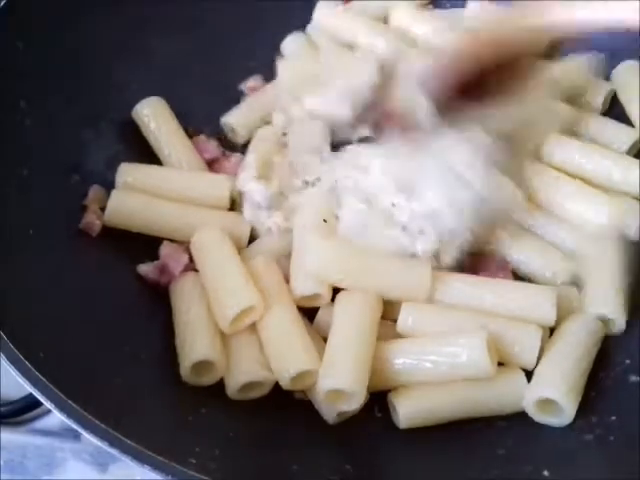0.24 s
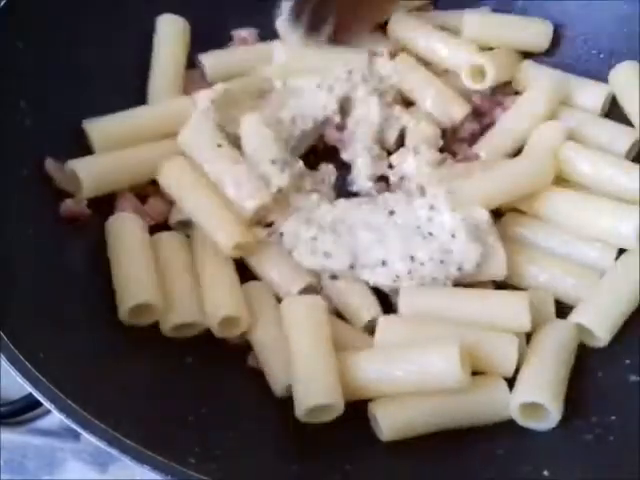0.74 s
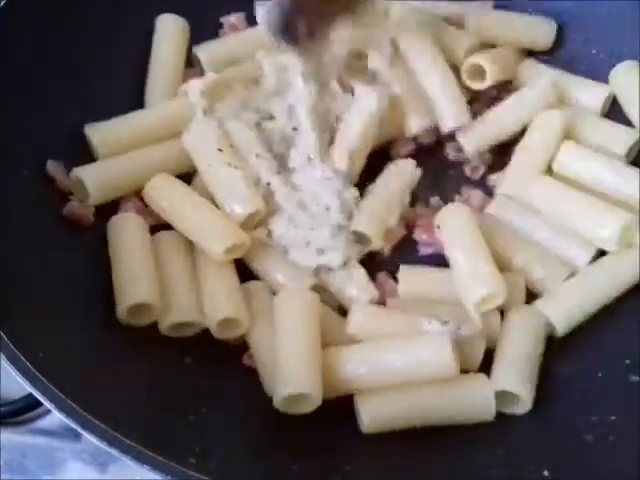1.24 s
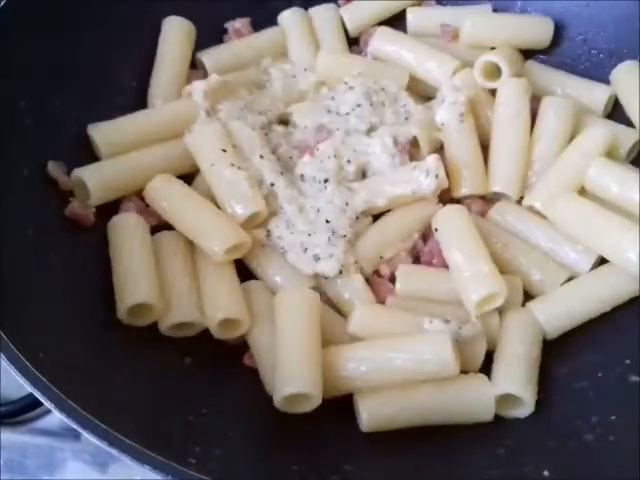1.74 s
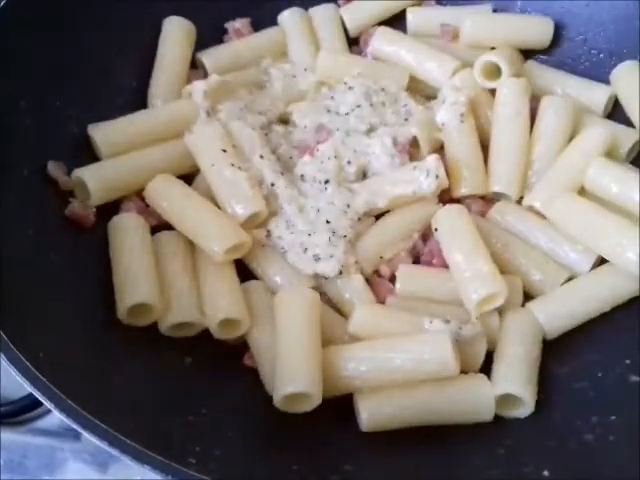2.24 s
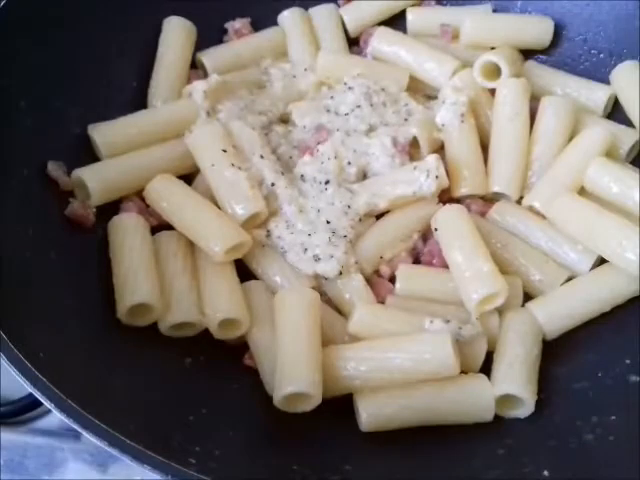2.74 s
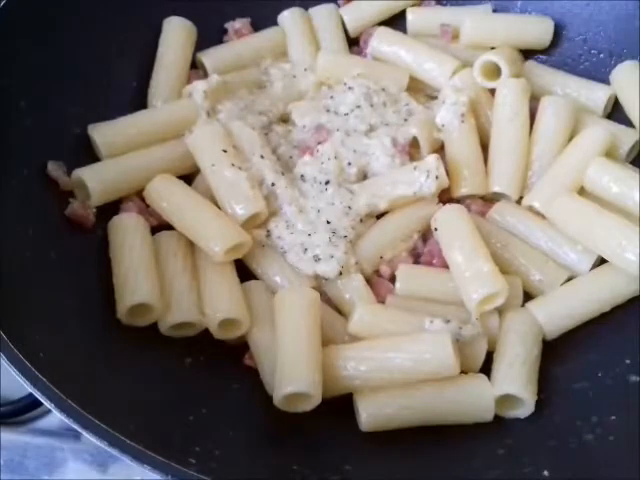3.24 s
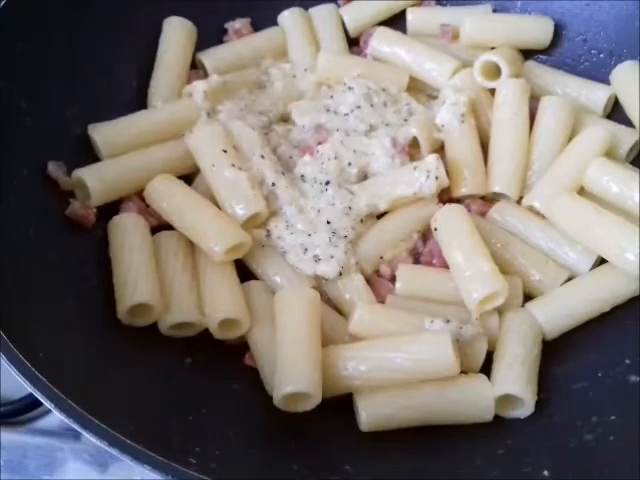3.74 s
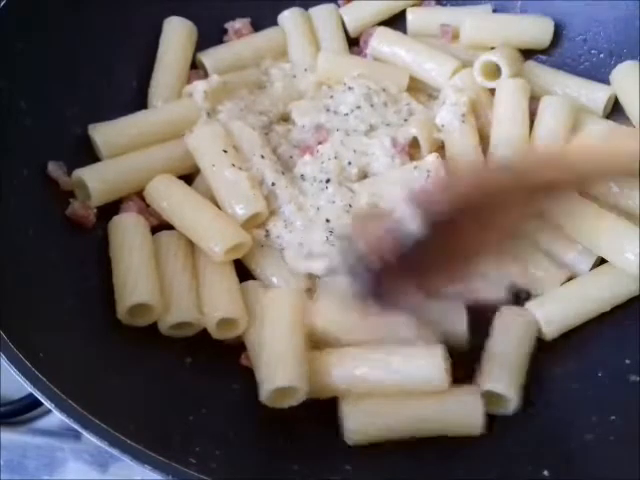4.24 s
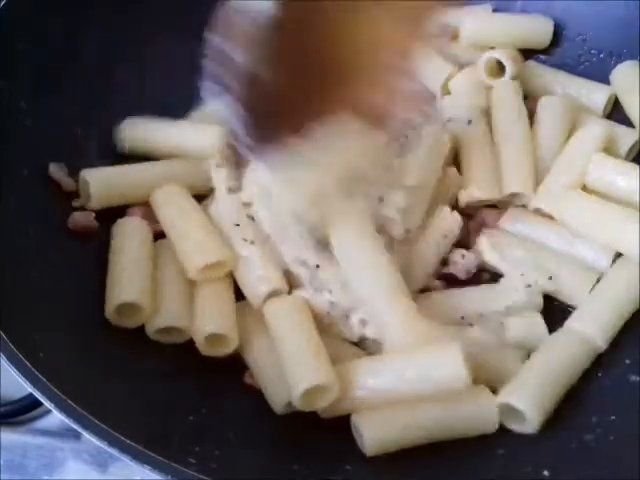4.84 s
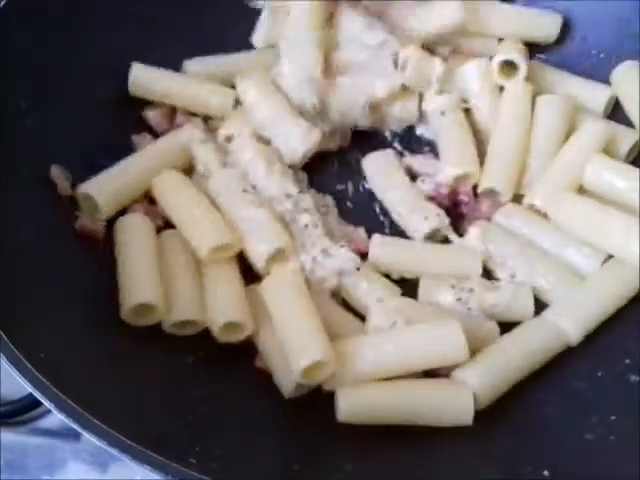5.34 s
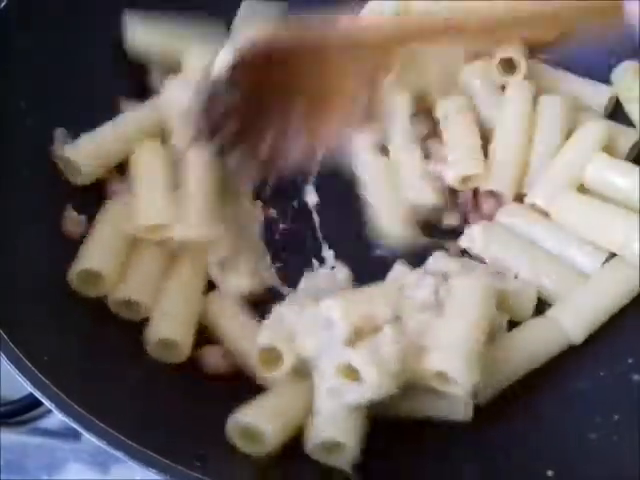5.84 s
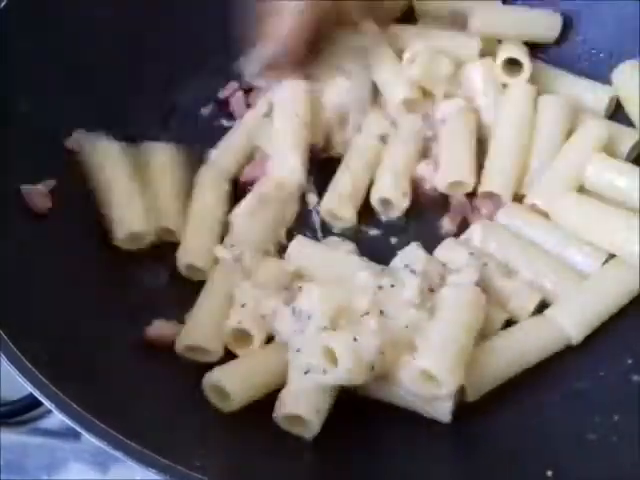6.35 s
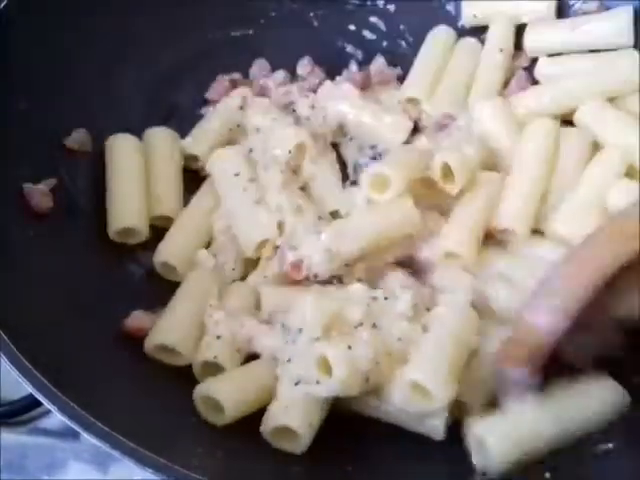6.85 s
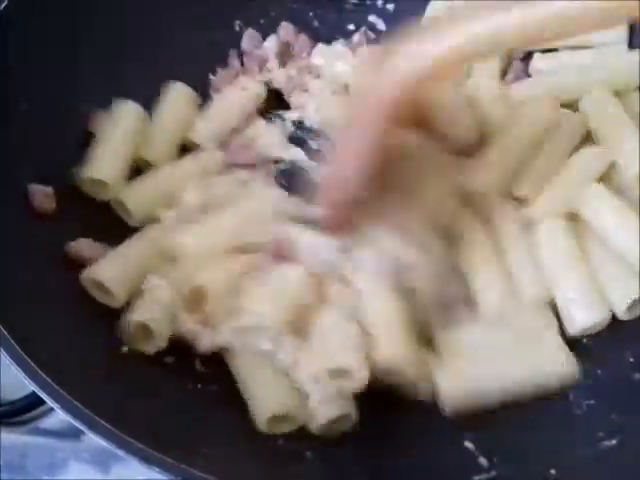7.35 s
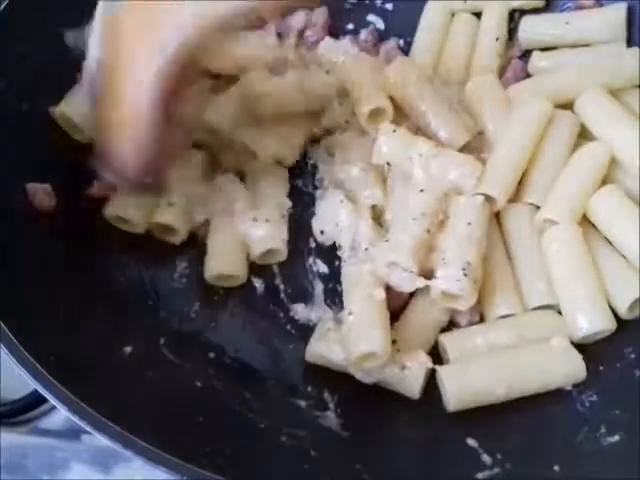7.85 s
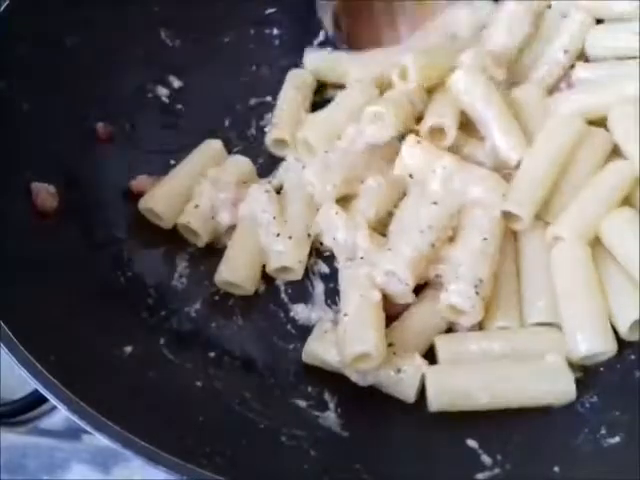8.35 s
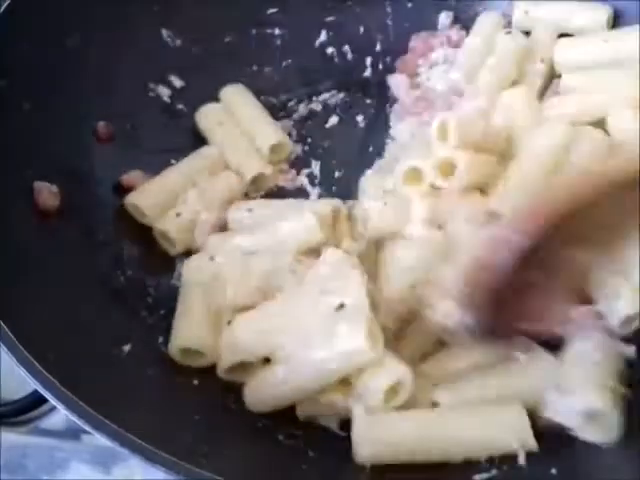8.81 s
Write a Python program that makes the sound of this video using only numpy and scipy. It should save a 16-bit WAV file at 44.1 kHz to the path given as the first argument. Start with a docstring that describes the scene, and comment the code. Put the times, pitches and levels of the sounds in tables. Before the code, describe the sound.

Close to a pan, thick sauce crackles and pops wetly as a wooden spoon folds pasta in quick strokes, with a light sizzle. The stirring thins to sparse pops, then a loud hard clatter breaks out across the kitchen, ringing with a brief metal ping. Stirring returns more softly, with rubs, dull bumps and slumping pasta over a very faint hum in a small hard room.

```python
"""Wet crackles and pops close by, a sizzle that comes and goes, rubs and bumps; further off a clatter and a hum.
A wooden spoon folds pasta through thick sauce in a warm nonstick pan: sauce films and fat bubbles are trains
of tiny swelling tones, raised by each stroke; bumps and slumping pasta excite filtered bursts and crackle.
Across the kitchen something hard is knocked and clatters down: noise bursts, decaying modes and a metal ping.
Steady sines make the appliance hum, filtered noise the room air and a faint drone."""
import sys
import numpy as np
from scipy import signal
from scipy.fft import rfft, irfft
from scipy.io import wavfile

SR = 44100
rng = np.random.default_rng(int(sys.argv[2]) if len(sys.argv) > 2 else 0)


def to_wav(sig):
    """Store sig (one row per channel, or 1-D mono) as 16-bit WAV at the path in sys.argv[1].

    Samples outside -1..1 are clipped; the rate is SR.
    """
    pcm = np.clip(np.atleast_2d(sig), -1, 1) * 32767
    pcm = np.round(pcm).astype(np.int16)
    wavfile.write(sys.argv[1], SR, pcm.T)  # frames by channels


N = 400428
TIME_S = np.arange(N) / SR
TOP_HZ = 15600  # upper limit of the sound

# Faint low drone swells. Each row: start in seconds, end in seconds, level in dB.
DRONE_SWELLS = [(3.72, 4.255, -59.5), (5.05, 5.28, -58.5), (5.77, 6.17, -56), (7.2, 7.623, -57.5)]
DRONE_REST_DB, DRONE_FADE_S = -67, .12
# Appliance hum. Each row: frequency in Hz, mean level in dB.
HUM_TONES = [(100, -74.5), (162, -76.5), (241, -72), (530, -74.5), (630, -71.5)]

# Knocks across the kitchen. Each row: start in seconds, level in dB, contact cut-off in Hz,
# low thud in dB relative to the knock.
KNOCKS = [(2.958, -13, 3280, -19), (3.007, -27, 2500, -10), (3.255, -11.5, 2500, -33),
          (3.279, -20.5, 2500, -35), (3.3225, -10, 2530, -26.5), (3.380, -12.5, 3020, -15),
          (3.417, -15, 2500, -20), (3.436, -18.5, 2500, -18)]
# Modes of the knocked body. Each row: frequency in Hz, relative level in dB, t60 in seconds.
KNOCK_MODES = [(408.4, -11, 0.26), (527, 3, .24), (591, 4.5, .28), (634, -4, .2), (748, -7, 0.28),
               (783, 4.5, 0.31), (900, 0, .32), (957, -1, 0.3), (1011, 0, 0.28), (1045, 1, .34),
               (1125, -7, .3), (1177, -1, .25), (1249, 1.5, 0.27), (1333, -2.5, .32), (1470, 2, 0.35),
               (1545, 0.5, .28), (1622, 2, .16), (1752, -3.5, 0.32)]
# Metal ping modes. Each row: frequency in Hz, relative level in dB, t60 in seconds.
PING_MODES = [(1847, -10.5, .8), (3985, 1, 0.34), (6930, -29, 0.26), (7060, -29.5, 0.16)]
PING_START_S, PING_DB = 3.381, -18

# Early reflections from pan floor, pan wall and hob. Each row: delay in seconds, level in dB.
REFLECTIONS = [(.0013, -39), (.0027, -23), (.0044, -27), (.0069, -23)]

# Pasta heaps slumping. Each row: centre in seconds, Gaussian half width in seconds, level in dB.
SLUMPS = [(4.725, .045, -58), (5.499, .04, -59), (5.86, 0.037, -66), (6.982, 0.063, -63),
          (7.683, 0.031, -62.5), (8.45, 0.075, -62.5), (8.986, 0.055, -65.5)]
# Spoon bumps on the pan, the last row a heap of pasta tumbling down. Each row: start in seconds, relative level
# in dB, # contact pitch in Hz, relative pan rumble in dB.
BUMPS = [(4.6553, -10, 1310, -36.5), (4.762, -39, 900, -44), (5.4621, -14.5, 870, -35.5),
         (6.499, -22, 1200, -62), (6.928, -44, 233, -54), (7.6564, -24.5, 474, -42.5),
         (8.444, -41, 350, -49)]
# Sharpest spits of fat. Each row: start in seconds, relative level in dB.
SPITS = [(.403, -30), (1.003, -39.5), (1.262, -34), (1.507, -38), (1.662, -33), (2.234, -35.5),
         (3.1203, -39.5), (5.2086, -38), (8.945, -39)]
# Large air pockets popping. Each row: start in seconds, relative level in dB, pitch in Hz, cycles to peak.
LARGE_POPS = [(.072, -14, 1640, 1.16), (.104, -18, 3300, 0.51), (.195, -12, 1430, 0.86),
              (.212, -11, 1670, 0.76), (.235, -13, 2440, 1), (.244, -10.5, 2000, 0.8),
              (.252, -12, 1610, .85), (.274, -8.5, 1571, 0.74), (.288, -11, 2750, 1.3),
              (.330, -9, 1800, 0.56), (.683, -19, 1510, .68), (.728, -20, 2750, 2.26),
              (.9, -15.5, 2680, 0.61), (.919, -13, 2580, 1.7), (0.98, -12, 2310, 0.91),
              (1.1, -13.5, 2420, 0.42), (1.211, -16.5, 2420, 0.49), (1.317, -18.5, 2820, .87),
              (1.458, -16, 2100, .35), (1.686, -20.5, 2240, .44), (1.855, -24, 1930, .97),
              (2.0812, -11.5, 1795, 1.55), (2.121, -25, 4970, 1), (2.274, -24.5, 2590, .63),
              (2.339, -18, 1970, 0.49), (2.38, -20.5, 2900, 2.4), (2.465, -27.5, 1360, 1.36),
              (2.615, -23, 1970, 0.75), (2.694, -19, 2370, 0.94), (2.795, -28.5, 1981, .8),
              (3.184, -21.5, 2260, 0.81), (3.226, -26, 3488, .73), (4.021, -18, 2030, 0.57),
              (4.179, -19, 2250, 0.78), (4.242, -17.5, 1800, 0.83), (4.3, -20, 2580, 1.65),
              (4.319, -17, 2790, 2.1), (4.416, -21.5, 2800, 1.1), (4.605, -22, 2780, 2.3),
              (4.82, -19.5, 3630, .41), (4.839, -16, 1490, 0.65), (4.914, -17, 2280, .8),
              (5.129, -18.5, 3140, .6), (5.186, -12, 3070, .72), (5.321, -15, 2970, 1.4),
              (5.553, -24, 3240, 2.5), (5.84, -23.5, 2120, .96), (5.946, -20.5, 1930, 0.65),
              (6.112, -21.5, 2490, .75), (6.26, -24.5, 3430, 0.72), (6.395, -23.5, 2300, .4),
              (6.467, -20.5, 2330, .56), (6.649, -30, 4500, .66), (7.273, -16, 3120, 0.42),
              (7.307, -14, 2640, 1.46), (7.437, -23.5, 2700, .39), (7.824, -26, 1570, 1.36),
              (8.121, -29.5, 4930, 0.94), (8.591, -24, 2420, .41), (8.667, -21.5, 2300, .42),
              (8.732, -29, 3200, .3), (8.789, -29.5, 1990, 1.4)]

# Spoon strokes. Each row: hardest push in seconds, rise in seconds, fall in seconds (both to 1/e),
# then relative levels in dB of wet crackle, sizzle, rubbing.
STROKES = [(0.089, .03, 0.082, -33, -69, -46), (0.274, 0.081, 0.11, -28.5, -49.5, -41.5),
           (.56, 0.078, .14, -43.5, -57.5, -48), (0.931, 0.053, .045, -36.5, -68, -59),
           (1.23, .1, 0.16, -38.5, -52.5, -53), (1.42, 0.049, .17, -43, -54.5, -57),
           (1.96, .03, 0.044, -42, -58.5, -57), (2.37, 0.028, 0.031, -46.5, -69, -68),
           (4.295, .05, 0.081, -38, -55, -56), (4.67, 0.028, 0.12, -38.5, -63, -55),
           (4.81, .02, .04, -43, -62, -64), (5.17, 0.12, 0.073, -38, -56, -53),
           (5.465, 0.15, .06, -40, -58.5, -52.5), (5.85, .06, .05, -42, -59, -48.5),
           (5.97, .025, 0.051, -47.5, -59, -70), (6.5, 0.043, 0.089, -37, -59, -53.5),
           (7.01, 0.06, 0.049, -44, -59, -44), (7.18, 0.055, 0.033, -47.5, -60.5, -73),
           (7.33, .03, .1, -49.5, -61, -57), (7.68, .025, 0.031, -46, -68, -48),
           (8.109, .025, .06, -43, -62, -52), (8.48, 0.087, 0.083, -46.5, -65, -44),
           (8.985, 0.06, 0.046, -46.5, -72, -47)]
STROKE_SHAPE = 1.2  # 1 = pointed peak, 2 = rounded
# The pan left to itself. Each row: time in seconds, then relative levels in dB of wet crackle, sizzle.
SIMMER = [(0, -42, -61), (1.6, -44.5, -63.5), (2.3, -49, -74), (2.9, -51.5, -81), (4.1, -49, -73),
          (5.6, -47.5, -65), (6.3, -51.5, -68), (7.9, -53.5, -77), (9.08, -50.5, -67)]
RUB_REST_DB = -65  # pasta shifting on the coating between strokes

# Chance pops: level is relative to the wet crackle, pitch and length are mid values.
SMALL_POPS_PER_S, SMALL_POP_DB, SMALL_POP_HZ, SMALL_POP_CYCLES = 22, 15, 2500, .9
SMALL_POP_SCATTER_DB, SMALL_POP_SCATTER_OCTAVES = 3.5, 0.41
SMALL_SPITS_PER_S, SMALL_SPIT_DB = 3.6, 20.5  # level is relative to the sizzle

# Spectrum of the room air. Each row: frequency in Hz, relative level in dB.
ROOM_SPECTRUM = [(25, -14), (50, -0.5), (80, -4.5), (120, -0.5), (250, -1.5), (400, 1), (700, 2),
                 (1500, -15.5), (4000, -1.5), (9000, -30), (15500, -28)]
# Spectrum of the drone. Each row: frequency in Hz, relative level in dB.
DRONE_SPECTRUM = [(80, -23.5), (160, -1.5), (210, -1.5), (290, -0.5), (340, 5), (400, -14.5), (800, -41.5)]
# Spectrum of each channel's noise. Each row: frequency in Hz, relative level in dB.
HISS_SPECTRUM = [(30, 4), (120, 7.5), (400, 10), (2500, 0.5), (5000, -1), (8500, -0.5), (10000, -8.5),
                 (11500, -1.5), (15500, -6)]
# Spectrum of a knock's noise. Each row: frequency in Hz, relative level in dB.
KNOCK_SPECTRUM = [(60, -30), (150, -42), (330, -14.5), (430, -7), (520, -0.5), (1000, 0.5), (1600, 0),
                  (2100, -9), (2900, -9.5), (3800, -15.5), (4600, -26.5), (7000, -38), (15000, -42)]
# Spectrum of a knock's thud. Each row: frequency in Hz, relative level in dB.
THUD_SPECTRUM = [(30, -30), (70, -14), (115, 3), (160, -15.5), (210, 5.5), (260, 2.5), (340, 2), (450, 1.5),
                 (900, -57)]
# Spectrum of slumping pasta, also of the dull part of a bump. Each row: frequency in Hz, relative level in dB.
SLUMP_SPECTRUM = [(40, -26), (80, -11), (120, -4.5), (160, -5.5), (210, -0.5), (290, -5.5), (420, -1),
                  (600, -7.5), (1200, -13), (4000, -46)]
# Pan response to rubbing and rumble. Each row: frequency in Hz, relative level in dB.
PAN_SPECTRUM = [(40, -29), (120, -20), (220, -14.5), (330, -7.5), (480, -6), (620, 1.5), (800, 3.5),
                (1300, 2.5), (2200, 2.5), (3700, -4.5), (4800, -24), (9000, -60)]
# Spectrum of the sizzle. Each row: frequency in Hz, relative level in dB.
SIZZLE_SPECTRUM = [(1000, -21), (3000, 9.5), (5000, 7.5), (7000, 3.5), (9000, -5.5), (10000, -13),
                   (11500, -4), (15500, -14)]
# Spectrum of the wet crackle. Each row: frequency in Hz, relative level in dB.
WET_SPECTRUM = [(200, -26.5), (500, -17.5), (850, -13), (1200, -5.5), (1650, 2), (2200, -0.5), (2900, 1),
                (3600, -5), (4500, -12), (6000, -24), (8000, -41.5), (14000, -37)]


def gain(db):
    """Decibels to amplitude factor."""
    return 10 ** (np.asarray(db) / 20)


def unit_rms(x):
    """Scale to rms 1."""
    return x / np.sqrt(np.mean(x ** 2))


def noise(size):
    """White Gaussian noise."""
    return rng.standard_normal(size)


def add(out, start_s, x):
    """Mix x into out from start_s, clipped at the end."""
    i = max(int(start_s * SR), 0)
    out[i:i + len(x)] += x[:max(len(out) - i, 0)]


def decay(t, t60_s):
    """Exponential decay by 60 dB in t60_s."""
    return np.exp(-np.log(1000) * t / t60_s)


def colour(x, spectrum, size=2048):
    """Minimum-phase filter with the given spectrum; white noise keeps its level."""
    hz, db = np.transpose(spectrum)
    bins_hz = np.fft.rfftfreq(size, 1 / SR)
    response = unit_rms(gain(np.interp(np.log(bins_hz + 1), np.log(hz), db)))
    # fold the cepstrum to make the filter causal
    cepstrum = irfft(np.log(response))
    cepstrum[1:size // 2] *= 2
    cepstrum[size // 2 + 1:] = 0
    impulse = irfft(np.exp(rfft(cepstrum)))
    return signal.fftconvolve(x, impulse)[:len(x)]


def two_pole(x, hz, kind="low"):
    """Two-pole low-pass or high-pass."""
    return signal.sosfilt(signal.butter(2, min(hz, SR / 3), kind, fs=SR, output="sos"), x)


def wander(rate_hz):
    """Random values at rate_hz joined by straight lines."""
    knots = noise(int(TIME_S[-1] * rate_hz) + 2)
    return np.interp(TIME_S * rate_hz, np.arange(len(knots)), knots)


def pop(hz, cycles):
    """A small cavity opens: its tone swells for the given cycles, then dies."""
    turn = np.arange(int(6 * cycles * SR / hz) + 2) * hz / SR
    envelope = (turn / cycles * np.exp(1 - turn / cycles)) ** 2
    return envelope * np.sin(2 * np.pi * turn)


def crackle(rate, spread_db, low_hz, high_hz, cycles, busy=0.99, patchy_db=0., count=28):
    """Random tiny pops, mostly weak, rate per second over all bands; share `busy` survives at steady power."""
    out = np.zeros(N)
    busy = np.clip(busy * np.ones(N), .05, 1)
    for band, hz in enumerate(np.geomspace(low_hz, high_hz, count)):
        if band % 4 == 0:
            patch = gain(patchy_db * wander(22))  # cavities of like size open in clusters
        when, strength, sign, luck = rng.random((int(rate * TIME_S[-1] / count), 4)).T
        at = (when * N).astype(int)
        size = patch[at] * gain(-spread_db * np.log(.05 + .95 * strength))
        kept = (luck < busy[at]) / np.sqrt(busy[at])
        train = np.bincount(at, size * np.sign(sign - .5) * kept, N)
        shape = pop(hz, cycles * 2 ** rng.uniform(-0.36, 0.72))
        out += hz * signal.oaconvolve(train, shape)[:N]  # hz evens out the spectrum
    return unit_rms(out)


def background():
    """Room air and a low drone are filtered noise; the hum is sines wavering in level and phase."""
    hum = np.zeros(N)
    for hz, db in HUM_TONES:
        level = gain(db + 2 * wander(2.7)) * np.sqrt(2)
        hum += level * np.sin(2 * np.pi * hz * TIME_S + .5 * wander(1.73))
    swell = np.zeros(N)
    for start_s, end_s, db in DRONE_SWELLS:
        inside_s = np.minimum(TIME_S - start_s, end_s - TIME_S)
        swell += gain(db) * np.clip(.5 + inside_s / DRONE_FADE_S, 0, 1)
    drone = colour(noise(N), DRONE_SPECTRUM) * np.hypot(swell, gain(DRONE_REST_DB))
    return hum + drone + gain(-60) * colour(noise(N), ROOM_SPECTRUM)


def ring(modes, t, scatter_db):
    """Decaying modes; each blow shares its force among them differently."""
    out = np.zeros(len(t))
    for hz, db, t60_s in modes:
        level = gain(db + scatter_db * rng.standard_normal())
        out += level * decay(t, t60_s) * np.sin(2 * np.pi * (hz * t + rng.random()))
    return out


def clatter():
    """Distant blows: a crack, the body's modes, a thud, and the kitchen's dense echo as decaying noise."""
    out, t = np.zeros(N), TIME_S[:SR]
    for start_s, db, cutoff_hz, thud_db in KNOCKS:
        blow = colour(noise(SR) * gain(-2.0) * decay(t, 0.39), KNOCK_SPECTRUM)
        blow += gain(-12.5) * ring(KNOCK_MODES, t, scatter_db=1.5)
        add(blow, 0, gain(10) * pop(hz=900, cycles=0.61))
        thud = two_pole(colour(noise(SR) * decay(t, 0.38), THUD_SPECTRUM), 70, "high")
        add(out, start_s, gain(db) * (two_pole(blow, cutoff_hz) + gain(thud_db) * thud))
    return two_pole(out, 110, "high")


def ping():
    """Metal modes ring out in the clatter, their onset held back as the room builds up."""
    out, t = np.zeros(N), TIME_S[:SR]
    tone = sum(gain(db) * decay(t, t60_s) * np.sin(2 * np.pi * hz * t) for hz, db, t60_s in PING_MODES)
    buildup = 1 - 0.65 * decay(t, 0.28)
    add(out, PING_START_S, gain(PING_DB) * tone * buildup)
    return out


def kitchen(x):
    """Quick reflections, scatter from nearby things, then the tail of a small hard room."""
    t = TIME_S[:SR // 2]
    near = noise(len(t)) * decay(t, 0.033) * (t > .003)
    far = two_pole(noise(len(t)) * decay(t, 0.64) * (t > .006), 8900)
    echo = gain(-14.5) * near / np.linalg.norm(near)
    echo += gain(-14.0) * far / np.linalg.norm(far)
    for delay_s, db in REFLECTIONS:
        add(echo, delay_s, gain([db]))
    return x + signal.fftconvolve(x, echo)[:N]


def slumps():
    """Soft tubes land on each other in a quick run of dull pats."""
    swell = sum(gain(db) * np.exp(-((TIME_S - s) / half_s) ** 2 / 2) for s, half_s, db in SLUMPS)
    pats = crackle(rate=700, spread_db=4, low_hz=69.5, high_hz=1200, cycles=0.97)
    return colour(swell * pats, SLUMP_SPECTRUM)


def effort(rest_db, column):
    """Level in dB of one stirring sound: each stroke swells and dies over the resting level."""
    power = gain(rest_db) ** 2
    for peak_s, rise_s, fall_s, *levels_db in STROKES:
        away = np.maximum((peak_s - TIME_S) / rise_s, (TIME_S - peak_s) / fall_s)
        near = away < 6
        push = np.zeros(N)
        push[near] = gain(levels_db[column]) * np.exp(-away[near] ** STROKE_SHAPE)
        power = power + push ** 2
    return 10 * np.log10(power)


def spoon(rub_db):
    """Wood slips and catches on the coating and bumps the pan, which the food damps."""
    rub = crackle(rate=3000, spread_db=2.0, low_hz=118.0, high_hz=4190, cycles=1.28, patchy_db=1.0)
    force = rub * gain(rub_db - 3)
    taps, t = np.zeros(N), TIME_S[:SR // 2]
    for start_s, db, hz, rumble_db in BUMPS:
        add(taps, start_s, gain(db) * pop(hz, cycles=0.41))
        add(force, start_s, gain(rumble_db) * noise(len(t)) * decay(t, 0.13))
        dull = colour(noise(len(t)) * decay(t, .35), SLUMP_SPECTRUM)
        add(taps, start_s, gain(rumble_db - 15.0) * dull)
    return colour(force, PAN_SPECTRUM) + two_pole(taps, 110, "high")


def sizzle(sizzle_db):
    """Tiny steam bubbles of like size burst in the fat; now and then one spits."""
    bubbles = crackle(rate=1400, spread_db=2.5, low_hz=2000, high_hz=15000, cycles=.5)
    fizz = bubbles * gain(sizzle_db)
    t = TIME_S[:SR // 200]
    at = rng.integers(0, N, int(SMALL_SPITS_PER_S * TIME_S[-1]))
    small_spits = list(zip(TIME_S[at], sizzle_db[at] + SMALL_SPIT_DB))
    for start_s, db in SPITS + small_spits:
        add(fizz, start_s + 0.00051, gain(db + 4.0) * noise(len(t)) * decay(t, 0.0054))
    return colour(fizz, SIZZLE_SPECTRUM)


def small_pops(wet_db):
    """Chance pops, louder as the sauce is worked harder: rows like those of LARGE_POPS."""
    when, size, pitch, length = rng.uniform(-1, 1, (int(SMALL_POPS_PER_S * TIME_S[-1]), 4)).T
    at = ((when + 1) / 2 * N).astype(int)
    db = wet_db[at] + SMALL_POP_DB + SMALL_POP_SCATTER_DB * size
    hz = SMALL_POP_HZ * 2 ** (SMALL_POP_SCATTER_OCTAVES * pitch)
    cycles = SMALL_POP_CYCLES * 2 ** length
    return list(zip(TIME_S[at], db, hz, cycles))


def pops(wet_db):
    """Air pockets open: a tick as the film snaps, the pop, and a short wet flutter at the same pitch."""
    out, t = np.zeros(N), TIME_S[:SR // 25]
    for start_s, db, hz, cycles in LARGE_POPS + small_pops(wet_db):
        flutter = noise(len(t)) * decay(t, 0.021)
        flutter = unit_rms(signal.fftconvolve(flutter, pop(hz, cycles=0.6)))
        tick = two_pole(noise(len(t)) * decay(t, 0.017), 3470)
        add(out, start_s - cycles / hz / 2, gain(db - 0.5) * pop(hz, cycles))
        add(out, start_s + 1 / hz, gain(db - 24.5) * flutter)
        add(out, start_s, gain(db - 24.5) / cycles * tick)
    return two_pole(out, 820, "high")


def sauce(wet_db):
    """Sticky films tear, more densely the harder they are stirred, over a bed of finer crackle."""
    busy = gain(wet_db + 33.5)
    coarse = crackle(rate=1900, spread_db=5.5, low_hz=609, high_hz=7770, cycles=1.0, busy=busy, patchy_db=4)
    fine = crackle(rate=6000, spread_db=2.5, low_hz=300, high_hz=12850, cycles=0.58, patchy_db=2.5)
    films = gain(-3.5) * coarse + gain(-3.0) * fine
    return colour(films, WET_SPECTRUM) * gain(wet_db - 2.5)


def scene():
    """The pan close by, the clatter and the room further off; all reach both channels alike."""
    simmer_s, *columns_db = np.transpose(SIMMER)
    resting_db = [np.interp(TIME_S, simmer_s, c) for c in columns_db] + [RUB_REST_DB]
    wet_db, sizzle_db, rub_db = (effort(rest_db, k) for k, rest_db in enumerate(resting_db))
    pan = sauce(wet_db) + pops(wet_db) + sizzle(sizzle_db) + spoon(rub_db) + slumps()
    return np.tile(kitchen(pan) + clatter() + ping() + background(), (2, 1))


def record(dry):
    """Each channel adds its own faint noise; the loudest peaks are rounded and the top is cut."""
    hiss = gain(-65.0) * np.array([colour(noise(N), HISS_SPECTRUM) for _ in range(2)])
    rounded = np.tanh(1.019 * dry) / 1.191
    top_cut = signal.ellip(8, .2, 70, TOP_HZ, fs=SR, output="sos")
    return signal.sosfilt(top_cut, rounded + hiss)


dry = scene()
out = record(dry)
to_wav(out)
```